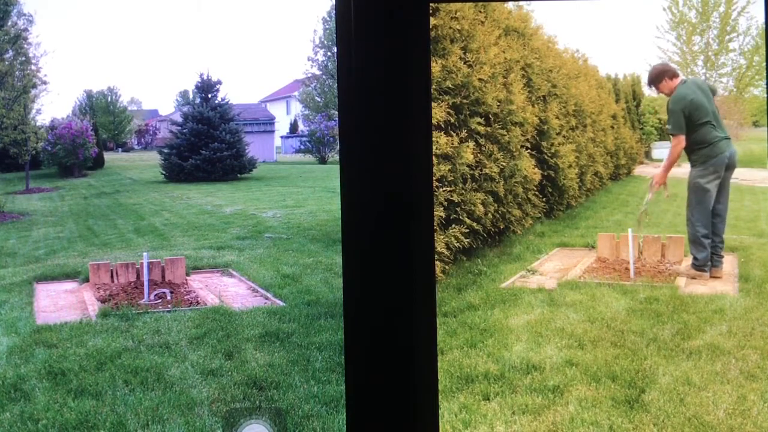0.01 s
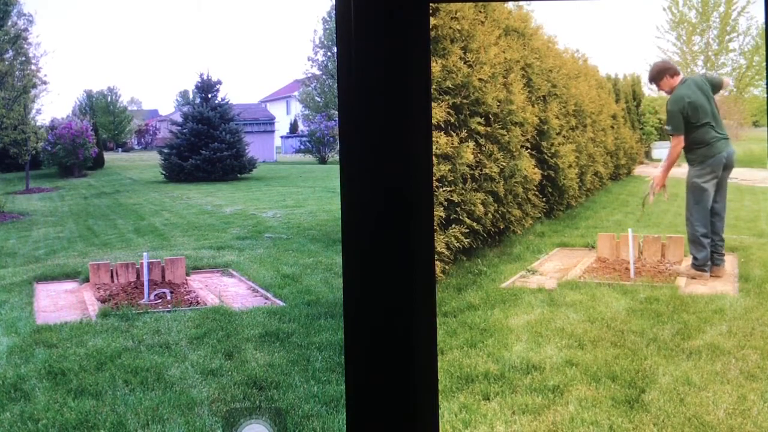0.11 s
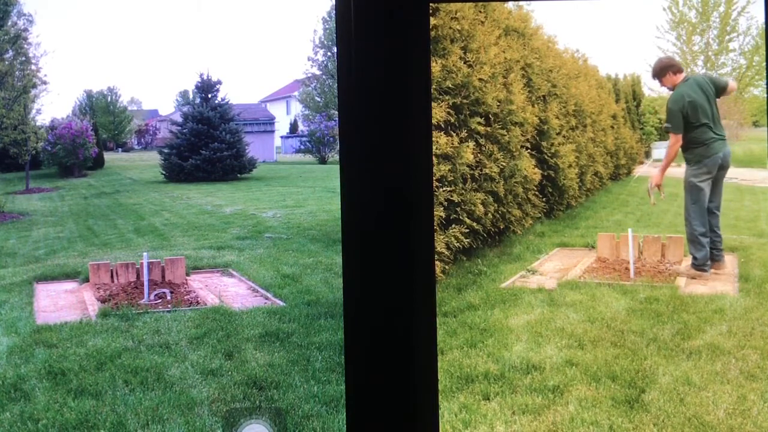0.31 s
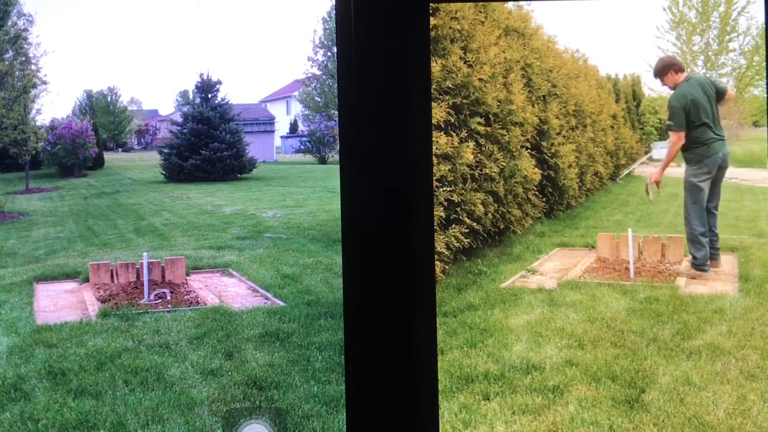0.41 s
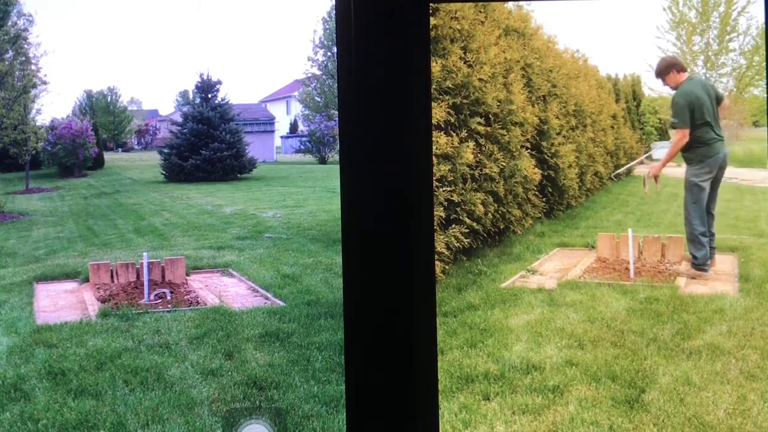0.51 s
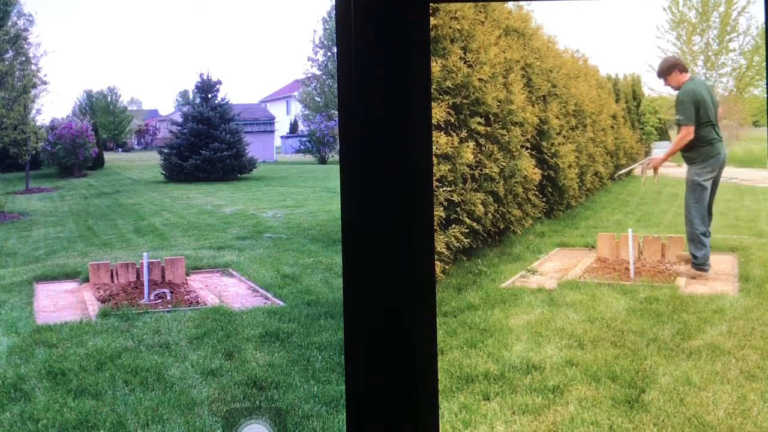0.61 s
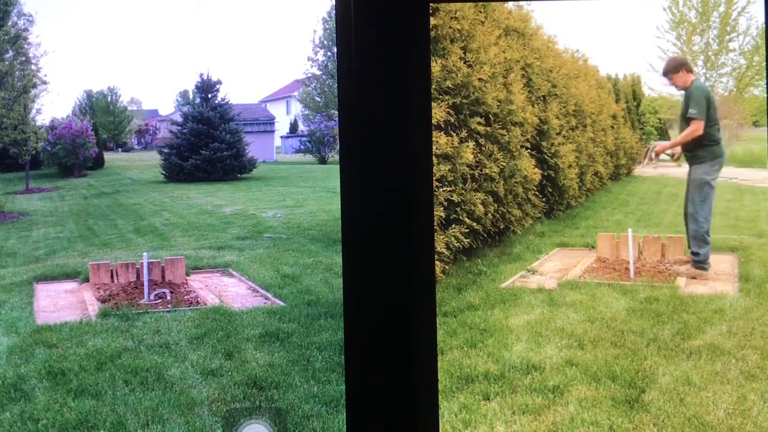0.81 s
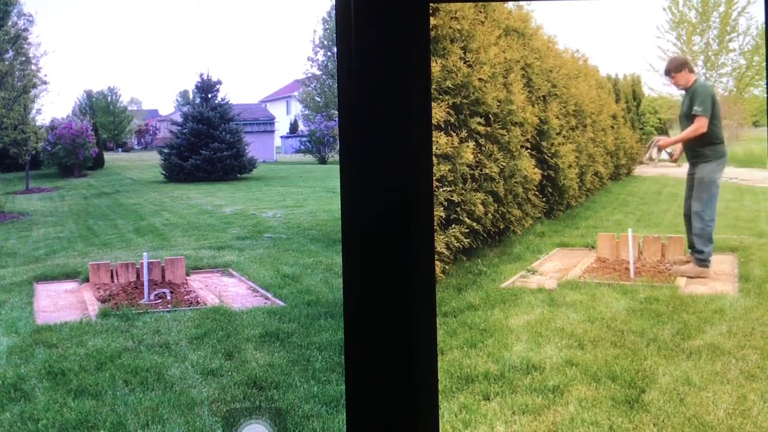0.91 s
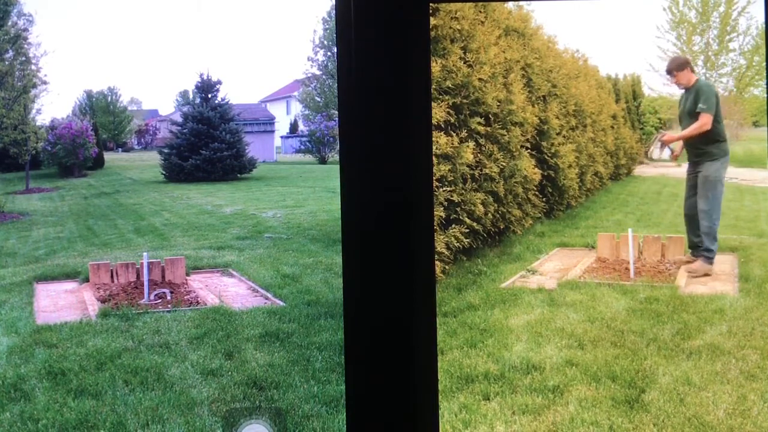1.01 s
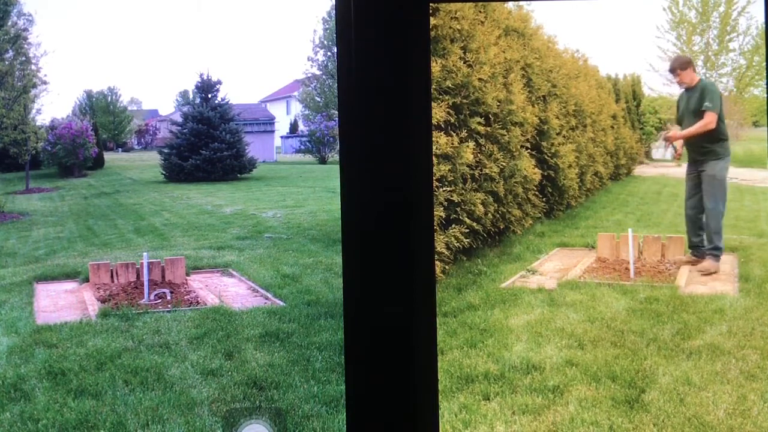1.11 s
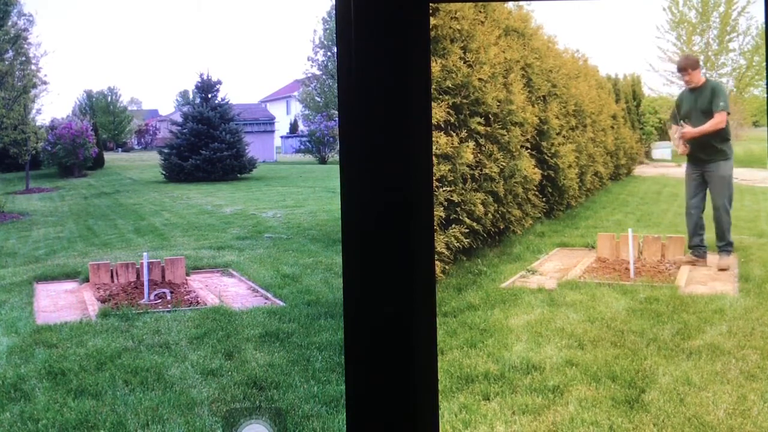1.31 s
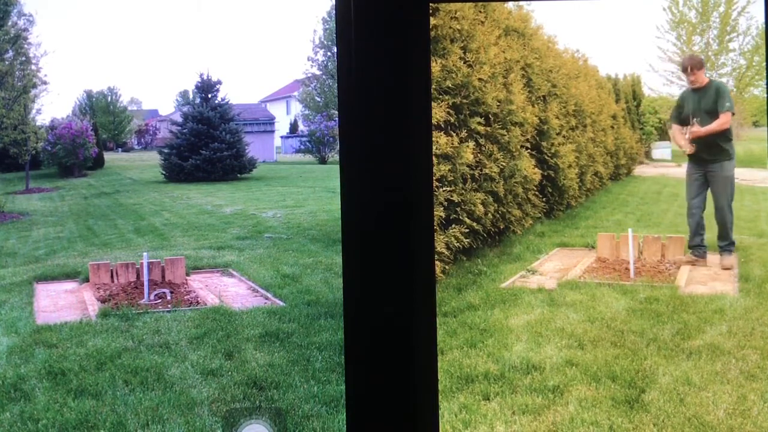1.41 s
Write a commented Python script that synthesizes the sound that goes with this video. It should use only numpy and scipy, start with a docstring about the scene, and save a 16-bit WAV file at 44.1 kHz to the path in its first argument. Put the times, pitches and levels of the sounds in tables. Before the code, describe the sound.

Steel horseshoes clank in a backyard. Quiet outdoor air and a faint hum run throughout; far birds chirp in the first 0.17 s beside a soft footfall. A hard, bright clank hits at 0.24 s, rattling densely until 0.5 s. More clinks come at 0.61-0.73 s, their ring soon choked, with light outdoor echo. Birds chirp faintly at 0.8-1.0 s; a faint scrape and tiny ticks follow from 1.27 s.

```python
"""Two steel horseshoes are lifted off a stake in a back yard, over outdoor air (noise) and a faint hum (sines).
Soft footfalls (low noise puffs) come and go. Far birds (gliding whistles) chirp first, and again late on.
After the first chirps comes one hard clank, then a rattle as the shoes swing together and a few more clinks:
short pings and noise make the clacks, decaying modes the ring, and touches choke it.
At the end a faint scrape of tiny ticks and noise is heard as they settle in the hand."""
import sys
import numpy as np
from scipy import signal
from scipy.fft import rfft, irfft
from scipy.io import wavfile
from scipy.ndimage import uniform_filter1d, minimum_filter1d

SR = 44100
rng = np.random.default_rng(int(sys.argv[2]) if len(sys.argv) > 2 else 0)


def int16_out(signal):
    """Quantize to a 16-bit WAV file."""
    q = np.round(np.clip(np.atleast_2d(signal).T, -1, 1) * 32767)
    wavfile.write(sys.argv[1], SR, q.astype(np.int16))


N = 66150
T = np.arange(N) / SR  # time of each sample [s]

# contacts that set the steel ringing, with a relative level for each family of modes: (time [s], body [dB],
# low [dB], low-middle [dB], middle [dB], upper-middle [dB], high [dB], treble [dB], top [dB], rise [s])
CONTACTS = [(.198, -70, -57, -51, -43.5, -75, -51, -60, -62.5, .001),
            (.236, -31, -22.5, -17, -7, -38, -11, -32.5, -45, 0.00091),
            (0.255, -39.5, -14.5, -31, -11, -53, -35, -60, -49, 0.0087),
            (0.273, -64, -15.5, -30.5, -40, -35, -15, -26.5, -44.5, 0.0067),
            (0.286, -69, -8, -34.5, -42, -28, -18.5, -37, -41, 0.013),
            (.309, -55, -43, -53, -38, -9, -21, -33.5, -46, 0.0027),
            (.338, -38, -25, -37, -40, -23.5, -29, -41, -57, .005),
            (.364, -50, -41, -41.5, -20, -16, -18, -37, -53.5, 0.0021),
            (0.393, -41, -28, -32, -20, -10, -37, -38, -59, 0.011),
            (.455, -60, -44, -54, -47, -22.5, -31.5, -46, -79, 0.0026),
            (0.496, -53, -49, -31.5, -32, -23, -39, -49, -73, 0.0039),
            (0.537, -52, -36, -31.5, -42.5, -22.5, -37, -77, -79, .01),
            (.6121, -46, -43, -43, -15, -23.5, -35, -38, -57, 0.00052),
            (.66, -50, -40, -26.5, -21.5, -29.5, -41, -49, -69.5, 0.0013),
            (0.6783, -48.5, -40, -39, -43, -37, -43, -53.5, -48, .0006),
            (0.699, -55, -40.5, -23.5, -20, -53, -48, -49.5, -76, 0.01),
            (0.766, -47, -43, -28.5, -33, -71, -45, -85, -72, 0.0057),
            (0.892, -73, -45, -50, -32, -54, -58, -80, -78, 0.01),
            (1.275, -57.5, -60, -58, -68, -45.5, -70, -78, -84, 0.0061),
            (1.293, -53, -40.5, -53, -46.5, -63, -61, -63, -80, 0.0034)]


def undb(db):
    """Turn decibels into a gain."""
    return 10 ** (np.asarray(db) / 20)


def fade(t, t60):
    """Die away from t = 0 at a steady rate, losing 60 dB in t60 seconds."""
    return (t >= 0) * np.exp(-np.log(1000) * np.maximum(t, 0) / t60)


def arch(start, length):
    """Swell from nothing and sink back to nothing over a length of time."""
    progress = np.clip((T - start) / length, 0, 1)
    return np.sqrt(np.abs(np.sin(np.pi * progress)))


def walk(rate):
    """Drift smoothly at random with a spread of 1; a higher rate [Hz] drifts faster."""
    width = max(int(SR / rate), 2)
    drift = uniform_filter1d(rng.standard_normal(N), width, mode="wrap")
    drift = uniform_filter1d(drift, width, mode="wrap")
    return drift / drift.std()


def tint(x, colour):
    """Colour a sound by (frequency [Hz], level [dB]) points without changing the power of white noise."""
    hz, db = np.array(colour, float).T
    size = 2 * N
    f = np.maximum(np.fft.rfftfreq(size, 1 / SR), 1)
    gain = undb(np.interp(np.log(f), np.log(hz), db))
    # folding the cepstrum forward makes a filter that never sounds before its input
    cepstrum = irfft(np.log(gain / np.sqrt(np.mean(gain ** 2))))
    cepstrum[1:N] *= 2
    cepstrum[N + 1:] = 0
    return irfft(rfft(x, size) * np.exp(rfft(cepstrum)))[:N]


def noise(colour, envelope=1):
    """Make white noise follow an envelope, then colour it."""
    return tint(envelope * rng.standard_normal(N), colour)


def bursts(events, colour, attack_s):
    """Make short puffs of coloured noise that rise and die away."""
    envelope = np.zeros(N)
    for start, db, t60 in events:
        rise = np.clip((T - start) / attack_s, 0, 1)
        # the puff is silent until halfway up its rise
        envelope += undb(db) * rise * fade(T - start - attack_s / 2, t60)
    return noise(colour, envelope)


def yard(x, echo_db):
    """Add the diffuse echo of hedge and houses: a delayed tail of fading noise."""
    delay_s, t60_s = 0.016, 0.54
    tail = rng.standard_normal(N) * fade(T - delay_s, t60_s)
    tail /= np.linalg.norm(tail)
    return x + undb(echo_db) * signal.fftconvolve(x, tail)[:N]


def background():
    """Mix flickering outdoor air, a coloured noise, with the wavering tones of a distant machine."""
    # colour of the air: (frequency [Hz], relative level [dB])
    air_colour = [(25, -31), (55, -6.5), (92, -14), (175, -22.5), (250, -12.5), (400, -18), (620, -6),
                  (900, -12), (1200, -6.5), (1560, -12), (2800, -6.5), (3300, -10), (3700, -6),
                  (4700, -21.5), (6800, -25), (8000, -34), (16000, -35)]
    # tones of the machine: (frequency [Hz], average RMS level [dB])
    hum_tones = [(120, -65.5), (589, -57)]
    air_db, air_flicker_db, hum_waver_db = -45.5, 0.8, 0.7
    sound = undb(air_db + air_flicker_db * walk(16)) * noise(air_colour)
    for hz, db in hum_tones:
        level = np.sqrt(2) * undb(db + hum_waver_db * walk(18))
        sound += level * np.sin(2 * np.pi * hz * T)
    return sound


def footfalls():
    """Soft steps on the grass give dull, mostly low puffs of noise."""
    # steps: (start [s], level [dB], time to fade by 60 dB [s])
    steps = [(.005, -41.5, 0.081), (.60, -50.5, 0.6), (.675, -61, 0.079), (.805, -43.5, 0.14),
             (1.18, -55, 0.15)]
    # colour of a step: (frequency [Hz], relative level [dB])
    thud_colour = [(80, -11), (180, -10), (270, 4.5), (400, -2), (900, -27), (3000, -56)]
    return bursts(steps, thud_colour, attack_s=0.0067)


def birds():
    """Whistled notes glide along a curve through three pitches and flicker with distance."""
    # notes: (start [s], length [s], start pitch [Hz], middle pitch [Hz], end pitch [Hz], relative level [dB])
    notes = [(0, 0.029, 4550, 4700, 4070, -40), (0.028, .022, 4400, 3780, 2960, -39),
             (0.066, 0.047, 3450, 3700, 3620, -41), (.086, 0.047, 3200, 2970, 3310, -40.5),
             (0.126, 0.044, 3650, 3740, 3440, -44), (0.818, 0.054, 4650, 4560, 4430, -46),
             (0.911, 0.054, 2650, 3270, 3830, -41), (0.962, 0.0217, 2770, 2642, 2370, -36),
             (0.998, 0.031, 2600, 2874, 3300, -50.5)]
    pitch_waver, flicker_db = 0.01176, 3  # fraction of the pitch, spread in dB
    out = np.zeros(N)
    for start, length, first_hz, middle_hz, last_hz, db in notes:
        progress = np.clip((T - start) / length, 0, 1)
        curve = np.polyfit([0, 0.5, 1], [first_hz, middle_hz, last_hz], 2)
        hz = np.polyval(curve, progress) * (1 + pitch_waver * walk(296))
        whistle = np.sin(2 * np.pi * np.cumsum(hz) / SR)
        out += undb(db) * arch(start, length) * whistle
    return out * undb(flicker_db * walk(110))


def slips():
    """Steel slipping on steel gives gritty bursts of bright noise."""
    # slips: (start [s], relative level [dB], time to fade by 60 dB [s])
    slip_events = [(.2362, -33, .2), (.6785, -34, .045), (.682, -45, .27), (1.265, -57, .3),
                   (1.3265, -47, .05)]
    # colour of the grit: (frequency [Hz], relative level [dB])
    grit_colour = [(1000, -11), (4000, -9), (7000, 12), (9000, -0.5), (10500, 3), (11800, 6.5), (14000, 3),
                   (16000, -19)]
    return undb(-3.5) * bursts(slip_events, grit_colour, attack_s=0.00086)


def rattle():
    """Dense tiny ticks swell and fade as the shoes slide over each other."""
    # rubs: (start [s], length [s], relative level [dB])
    rubs = [(.24, 0.32, -31.5), (.675, 0.35, -43.5), (1.27, 0.22, -46.5)]
    # colour of the ticks: (frequency [Hz], relative level [dB])
    rattle_colour = [(600, -31), (1300, -15), (1900, -10.5), (2400, 4), (2850, 2), (3300, -3.5),
                     (3800, 0.5), (4600, -16), (5400, -37.5), (15000, -57)]
    tick_rate = 900  # average ticks per second
    ticks = (rng.random(N) < tick_rate / SR) * rng.standard_normal(N)
    ticks *= np.sqrt(SR / tick_rate)  # as strong as steady noise, however sparse
    swell = sum(undb(db) * arch(start, length) for start, length, db in rubs)
    return tint(ticks * swell, rattle_colour)


def jangle():
    """Many small high modes merge into coloured noise that rings on after the bright contacts."""
    # colour of the jangle: (frequency [Hz], relative level [dB])
    jangle_colour = [(5400, -41.5), (6000, 5.5), (6400, -1), (6900, 21.5), (7700, -21.5), (8600, -7),
                     (9400, -4), (11700, -27), (12400, -25), (15500, -19)]
    level_db, t60_s = -1.5, 0.21
    power = np.zeros(N)
    for start, *_, treble_db, top_db, rise in CONTACTS:
        power += (undb(treble_db) * fade(T - start, t60_s)) ** 2
    return undb(level_db) * noise(jangle_colour, np.sqrt(power))


def clacks():
    """Each dry clack of shoe on shoe is a choked ping at its own pitch, a crackle and a dull knock."""
    # clacks: (start [s], relative level [dB], pitch [Hz], relative level of the dull knock [dB])
    clack_events = [(0.2358, -5.5, 2500, -33), (0.272, -12, 2670, -44), (0.284, -11, 2840, -27.5),
                    (0.3221, -10.5, 2490, -58), (0.364, -15.5, 2670, -61), (0.3765, -13.5, 2680, -60),
                    (0.4147, -17, 2930, -54), (0.4258, -14.5, 2630, -58), (0.4492, -21.5, 2670, -60),
                    (0.4597, -14, 2700, -55), (0.4798, -23.5, 2770, -60), (0.6139, -21.5, 4460, -48),
                    (0.6607, -26.5, 4120, -50), (0.6781, -12.5, 2400, -30.5), (.687, -18.5, 2200, -34),
                    (0.7266, -14, 2490, -28.5), (.825, -47, 2760, -43), (1.3275, -31.5, 2390, -38.5),
                    (1.377, -43, 2660, -39.5), (1.4327, -31, 2780, -47)]
    # colour of the crackle: (frequency [Hz], relative level [dB])
    crackle_colour = [(400, -38.5), (1400, -27), (2400, 5), (2850, -4), (3300, -2.5), (4400, -6),
                      (5400, -23), (8000, -37), (15500, -44)]
    # colour of the dull knock: (frequency [Hz], relative level [dB])
    knock_colour = [(200, -29.5), (750, -6.5), (1500, 2), (2200, 3), (5000, -17.5), (12000, -53)]
    rise_s, ping_t60_s, crackle_t60_s, knock_t60_s = 0.0007, 0.025, 0.037, 0.051
    crackle_db = -10  # against the ping
    pings = np.zeros(N)
    crackle_events, knock_events = [], []
    for start, db, hz, knock_db in clack_events:
        t = T - start
        envelope = np.clip(t / rise_s, 0, 1) * fade(t, ping_t60_s)
        pings += undb(db) * envelope * np.sin(2 * np.pi * hz * t)
        crackle_events.append((start, db + crackle_db, crackle_t60_s))
        knock_events.append((start, knock_db, knock_t60_s))
    crackle = bursts(crackle_events, crackle_colour, rise_s)
    knocks = bursts(knock_events, knock_colour, rise_s)
    return pings + crackle + knocks


def ringing():
    """Contacts add energy to each mode, touches choke it; level and pitch sway a little as the shoes turn."""
    # modes of the steel: (frequency [Hz], level within its family [dB], time to fade by 60 dB [s], family)
    modes = [(1254, 0, .7, "body"), (1415, -9, .7, "body"), (1904, -5, .7, "body"), (2169, 0, .55, "low"),
             (2262, -13, .55, "low-middle"), (2300, 0, .8, "low-middle"), (2607, -19, .5, "low-middle"),
             (2629, -18, .5, "low-middle"), (3235, -24, .9, "middle"), (3285, -19, .4, "middle"),
             (3458, 0, .5, "middle"), (3478, 0, .42, "upper-middle"), (4852, 0, .28, "high"),
             (4884, -11, .33, "high"), (5017, -19, .33, "high"), (6756, -1, .42, "treble"),
             (6954, -4, .33, "treble"), (7065, -10, .28, "treble"), (9050, 0, .3, "top"),
             (9480, -5, .18, "top"), (11300, -9, .28, "top"), (11710, -1, .27, "top"),
             (10250, -10, .14, "top"), (13400, -12, .14, "top"), (14035, -9, .22, "top")]
    # names of the families, in the order of the contact levels
    families = ["body", "low", "low-middle", "middle", "upper-middle", "high", "treble", "top"]
    # touches that choke a family of modes: (start [s], change in level [dB], family)
    touches = [(0.271, -9.5, "middle"), (0.307, -16.5, "low"), (.325, -8.5, "upper-middle"),
               (.374, -14, "upper-middle"), (.428, -14, "low"), (0.434, -33, "upper-middle"),
               (0.574, -5, "upper-middle"), (0.625, -7.5, "middle"), (0.674, -9.5, "middle"),
               (.785, -11.5, "middle"), (0.933, -20, "middle"), (1.302, -10, "upper-middle"),
               (.52, -10, "high"), (.56, -6, "high"), (.81, -6, "high")]
    # how strongly each family flutters: family -> spread [fraction of the ring]
    roughness = {"body": .05, "low": .05, "low-middle": .05, "middle": .06, "upper-middle": .13, "high":
                 .26, "treble": .24, "top": .42}
    touch_s = 0.012  # time a touch takes to choke
    detune = 0.00036  # pitch scatter between contacts, fraction of the pitch
    sway_db, sway_rate, flutter_rate = 2.33, 30, 170  # rates in Hz
    wobble_hz, wobble_rate = 1.8, 30  # spread and rate of the pitch drift, both in Hz
    out = np.zeros(N)
    for hz, db, t60, family in modes:
        choke_db = np.zeros(N)
        for start, loss_db, name in touches:
            if name == family:
                choke_db += loss_db * np.clip((T - start) / touch_s, 0, 1)
        choke = undb(choke_db)
        ring = np.zeros(N, complex)
        chance = rng.standard_normal((len(CONTACTS), 2))
        for (start, *family_db, rise), (off, side) in zip(CONTACTS, chance):
            i = int(start * SR)
            t = T[:min(N - i, int(t60 * SR))]
            # a quarter turn from the present ring, so that energies add
            phase = np.angle(ring[i]) + np.sign(side) * np.pi / 2
            swing = np.exp(1j * (phase + 2 * np.pi * hz * (1 + detune * off) * t))
            push = np.sin(np.pi / 2 * np.minimum(t / rise, 1)) ** 2
            # earlier touches do not weaken a new contact
            level = undb(db + family_db[families.index(family)]) / choke[i]
            ring[i:i + len(t)] += level * fade(t, t60) * push * swing
        flutter = 1 + roughness[family] * (walk(flutter_rate) + 1j * walk(flutter_rate))
        wobble = np.exp(2j * np.pi * np.cumsum(wobble_hz * walk(wobble_rate)) / SR)
        sway = undb(sway_db * walk(sway_rate))
        out += (ring * choke * flutter * wobble).imag * sway
    return out


def scene():
    """Mix air, hum, footfalls, birds and horseshoes; the yard echoes the birds and the steel."""
    steel = undb(2) * (ringing() + clacks() + jangle() + rattle() + slips())
    far_birds = yard(birds(), echo_db=-1.5)
    mix = background() + footfalls() + far_birds + yard(steel, echo_db=-9.5)
    return mix[None]


def record(dry):
    """The recorder turns its gain down on loud peaks, holds it, recovers and cuts the top."""
    knee_db, ratio = -12.5, 1.447  # above the knee, levels in dB grow this many times more slowly
    release_s, hold_s, top_hz = 0.15, 0.24, 15900
    # the loudest recent peak, slowly forgotten
    leak = np.exp(-T / release_s)
    peak = np.maximum.accumulate(np.abs(dry[0]) / leak) * leak
    gain = np.maximum(peak / undb(knee_db), 1) ** (1 / ratio - 1)
    # hold the lowest recent gain, then smooth its steps
    half = int(hold_s * SR / 2)
    gain = minimum_filter1d(gain, 2 * half + 1, origin=half, mode="nearest")
    gain = uniform_filter1d(gain, size=64)
    top_cut = signal.ellip(8, 0.2, 80, top_hz, fs=SR, output="sos")
    return signal.sosfilt(top_cut, dry * gain)


dry = scene()
out = record(dry)
int16_out(out)
```